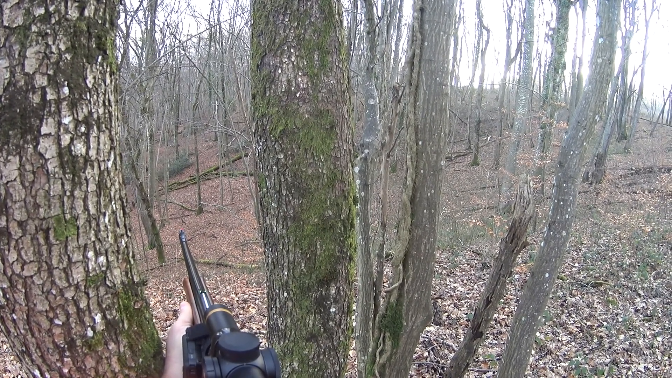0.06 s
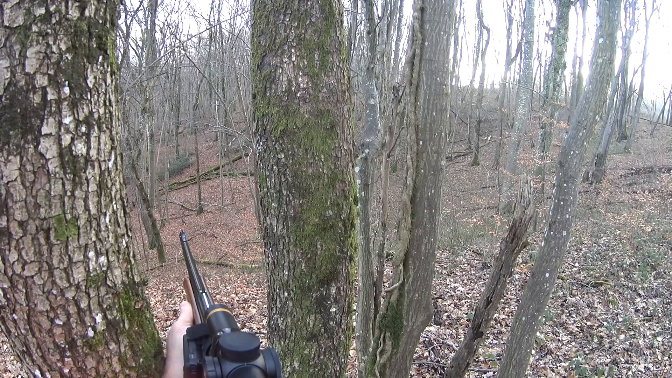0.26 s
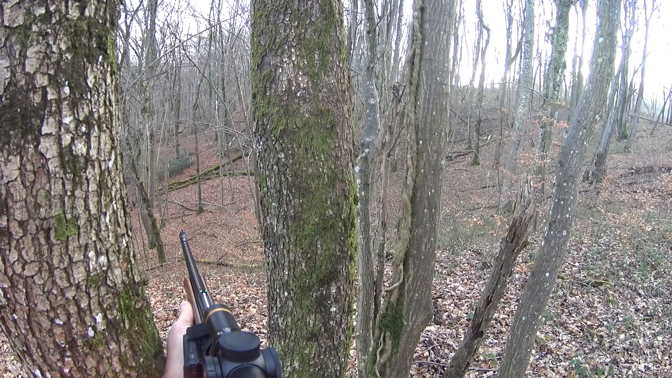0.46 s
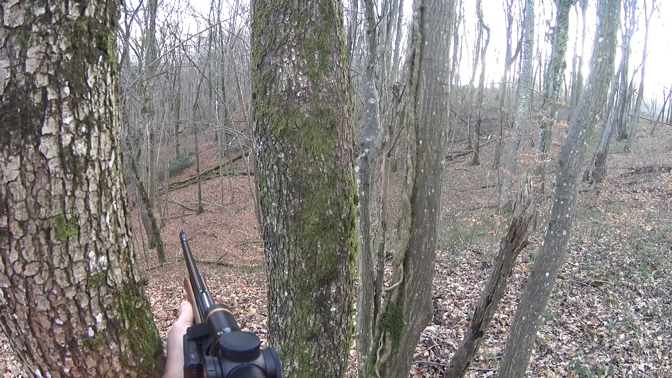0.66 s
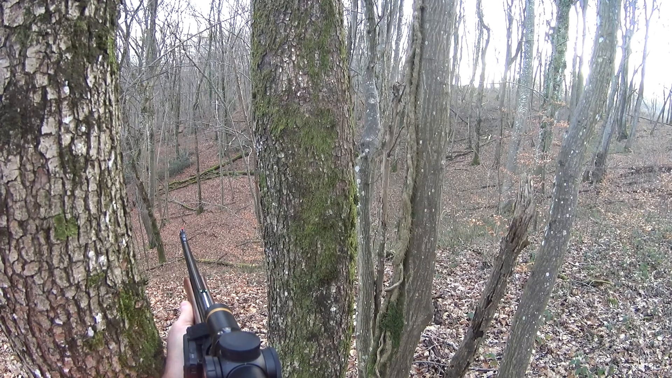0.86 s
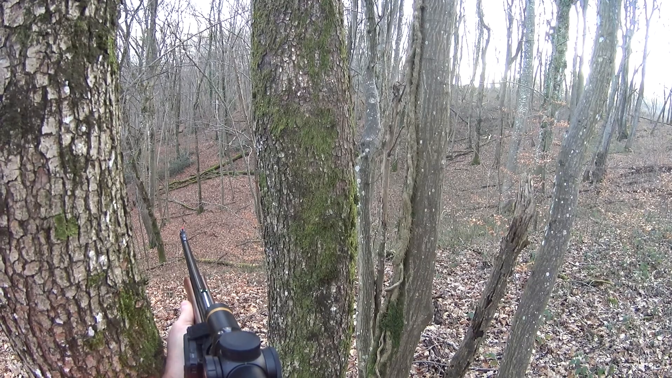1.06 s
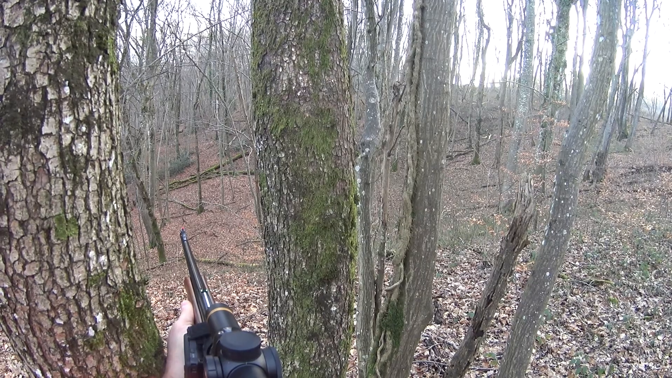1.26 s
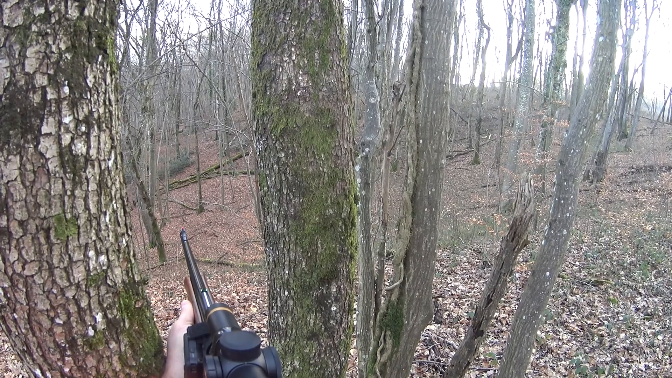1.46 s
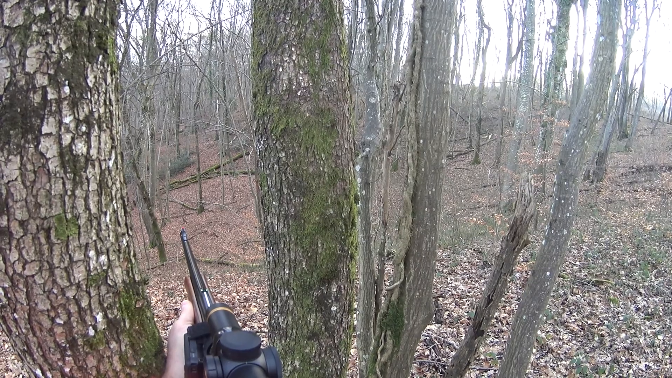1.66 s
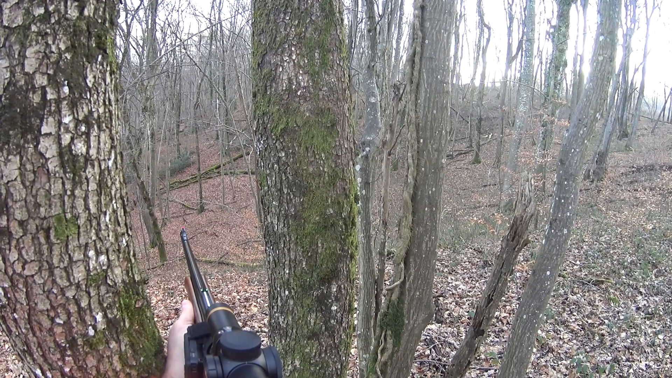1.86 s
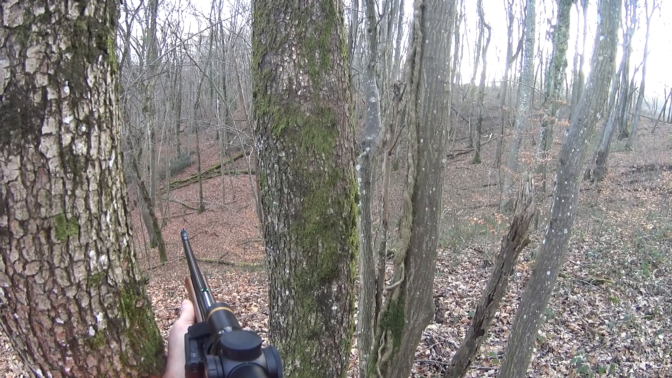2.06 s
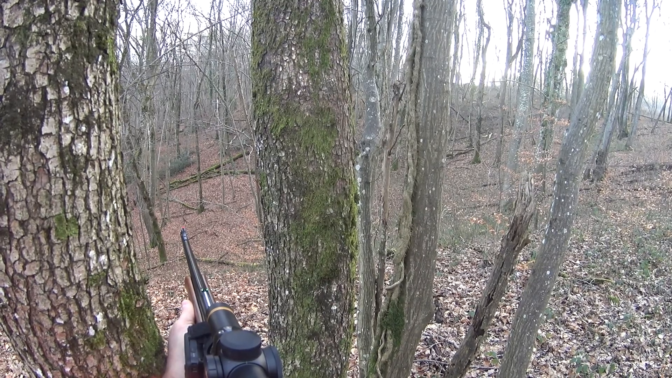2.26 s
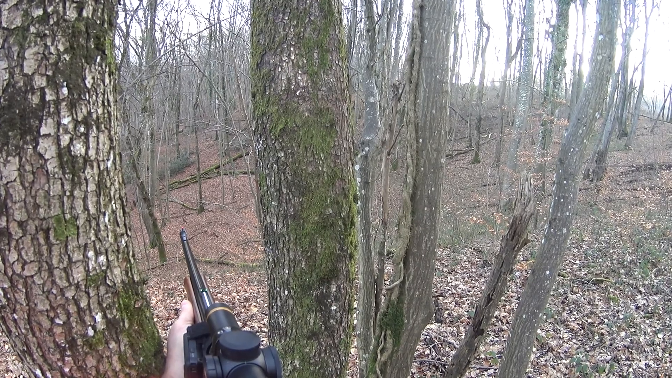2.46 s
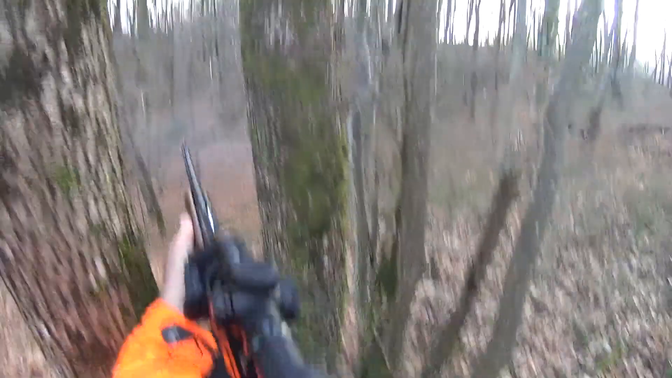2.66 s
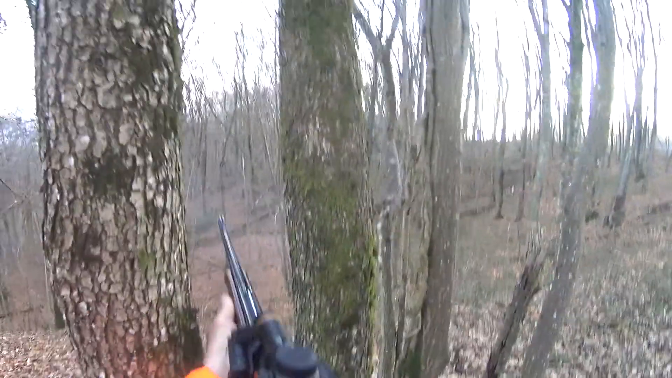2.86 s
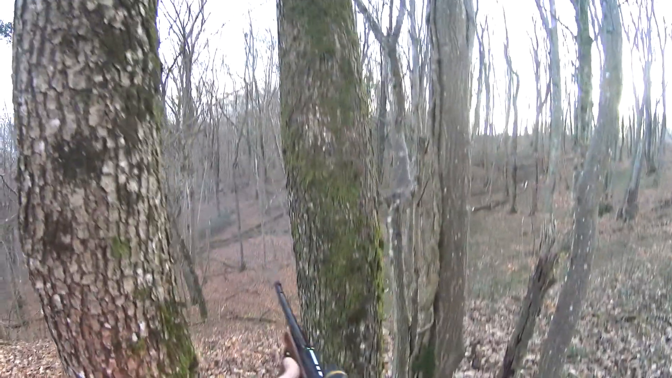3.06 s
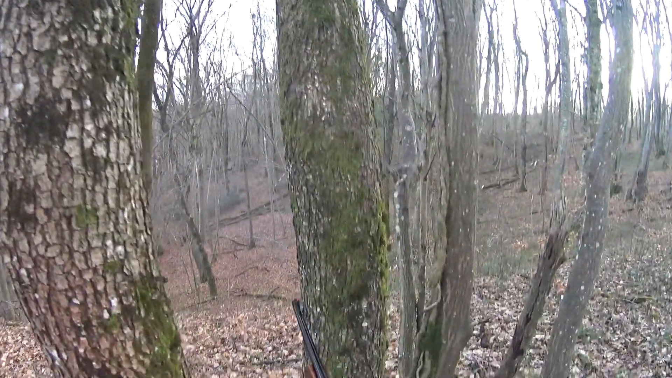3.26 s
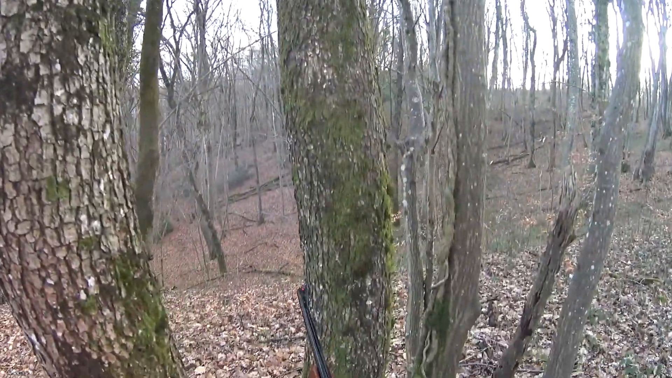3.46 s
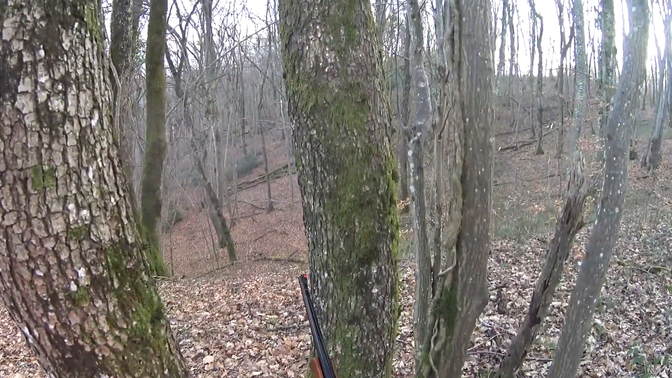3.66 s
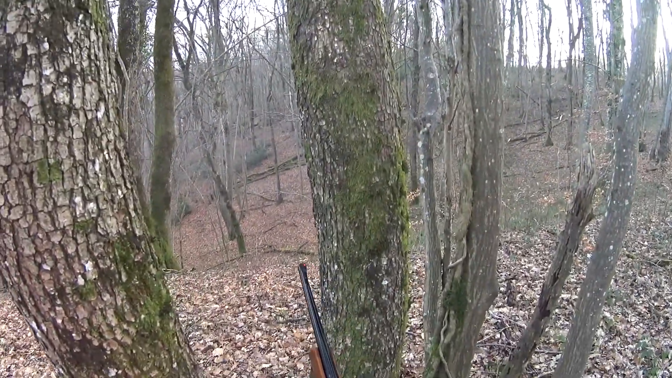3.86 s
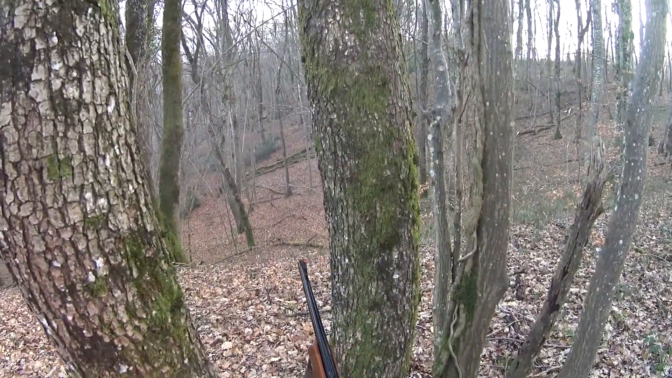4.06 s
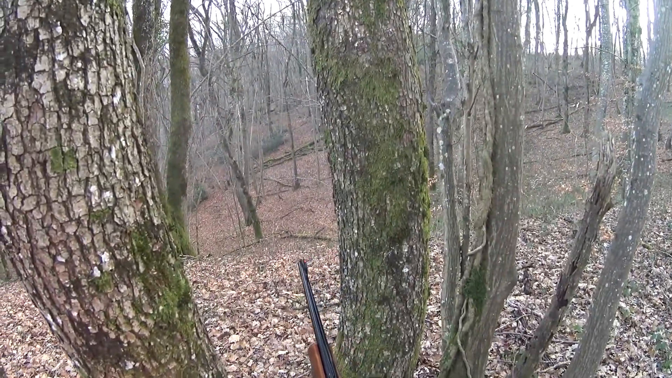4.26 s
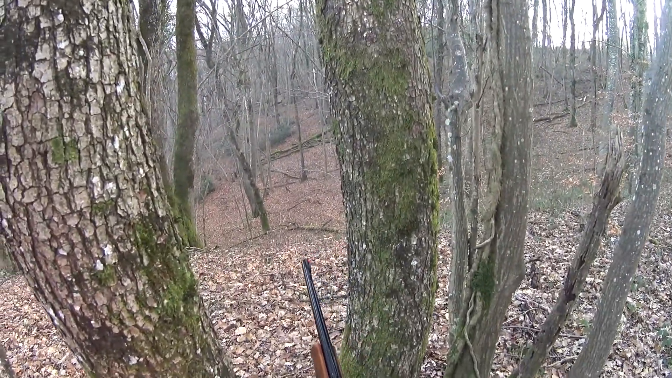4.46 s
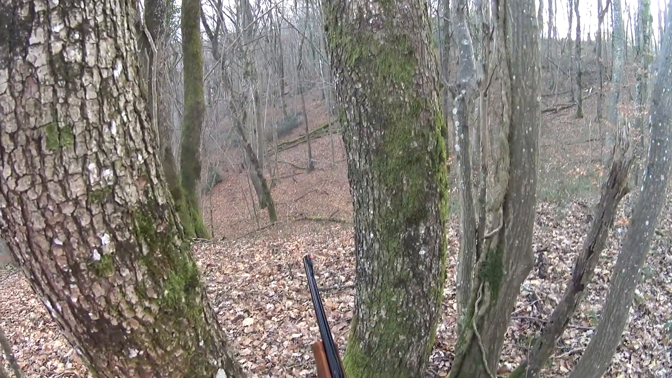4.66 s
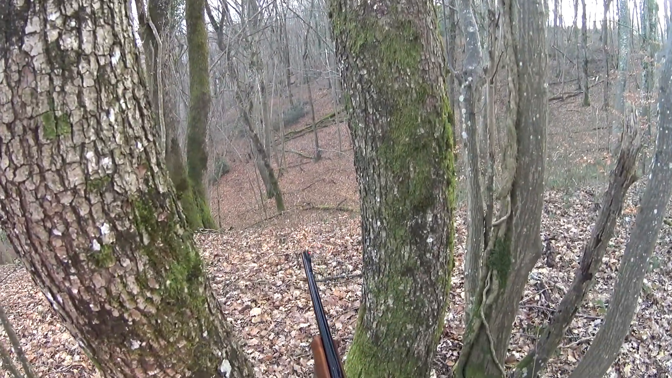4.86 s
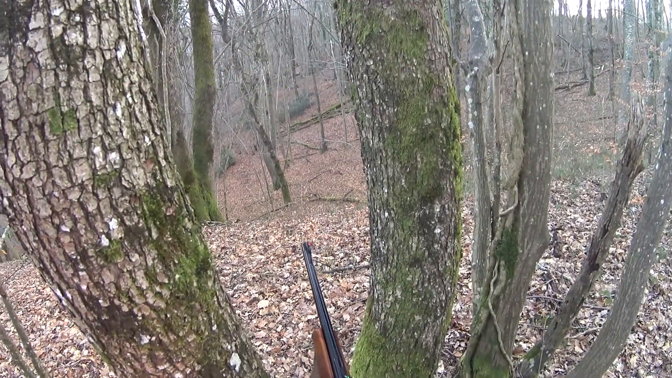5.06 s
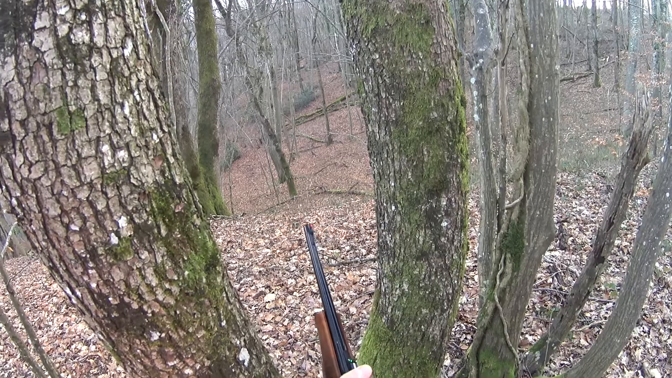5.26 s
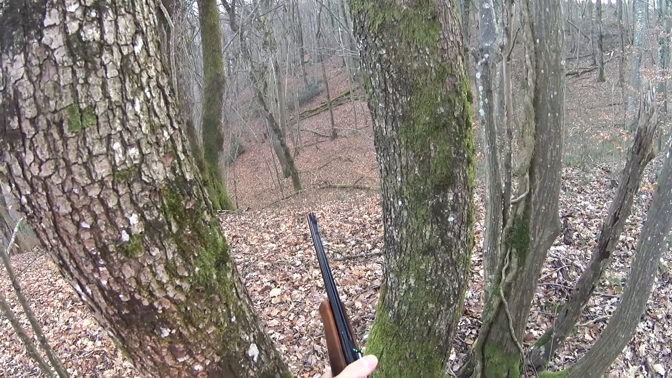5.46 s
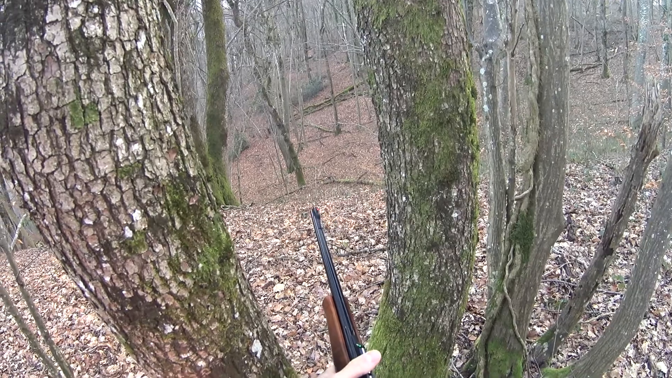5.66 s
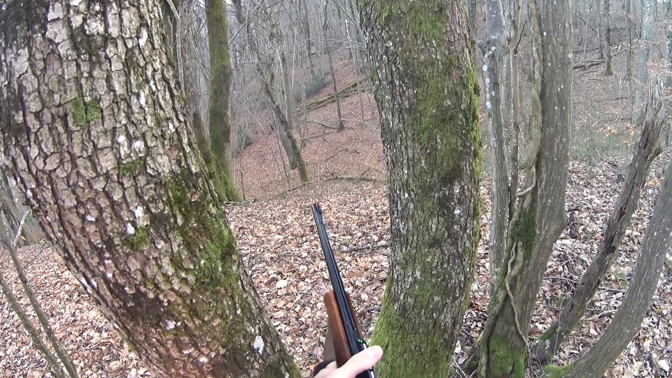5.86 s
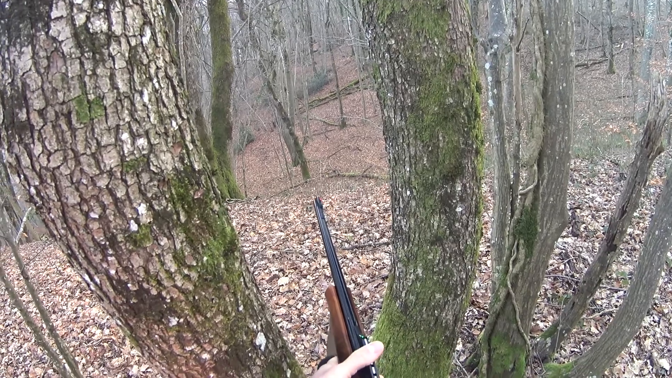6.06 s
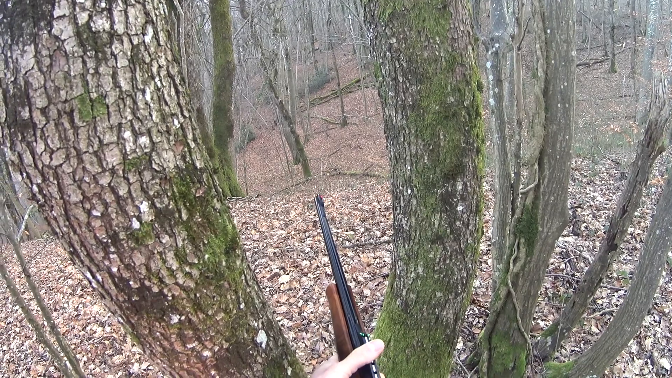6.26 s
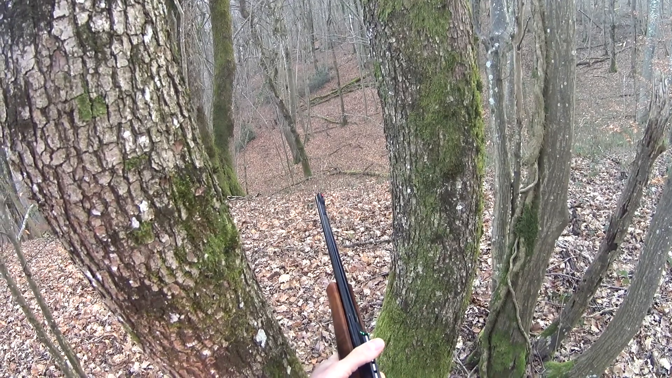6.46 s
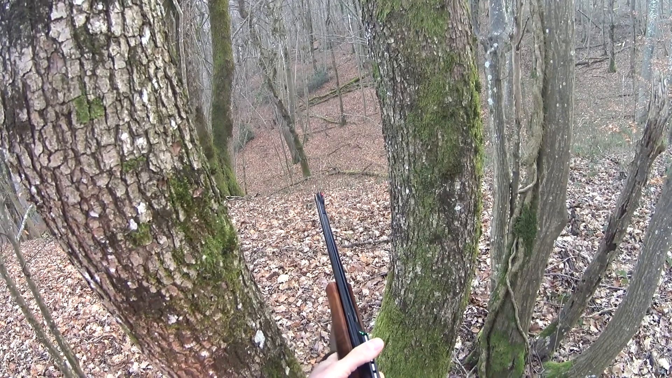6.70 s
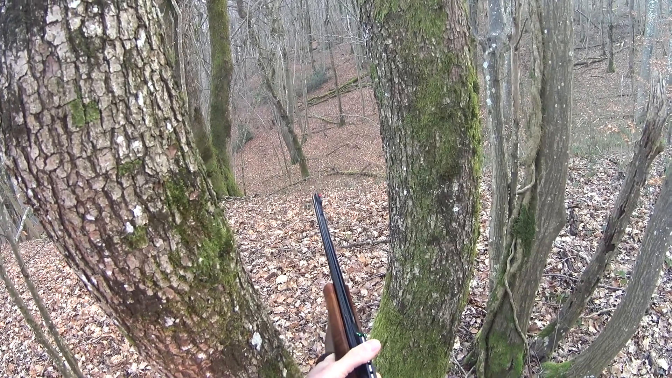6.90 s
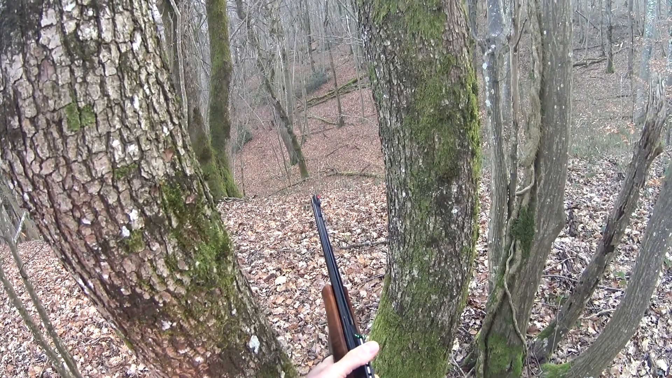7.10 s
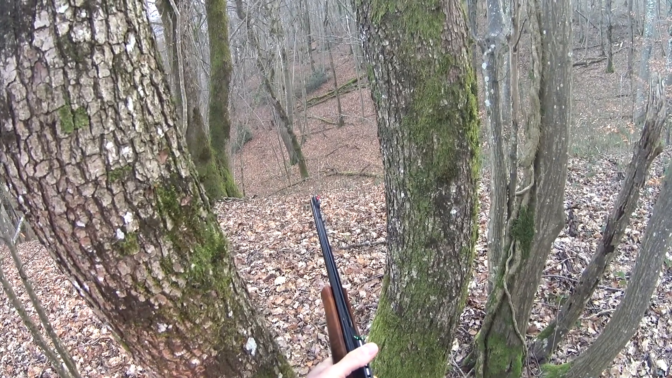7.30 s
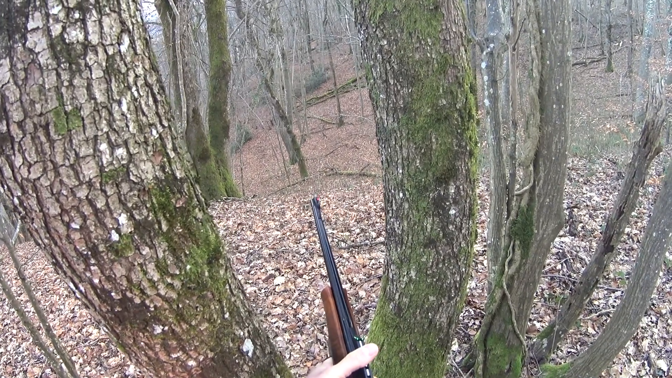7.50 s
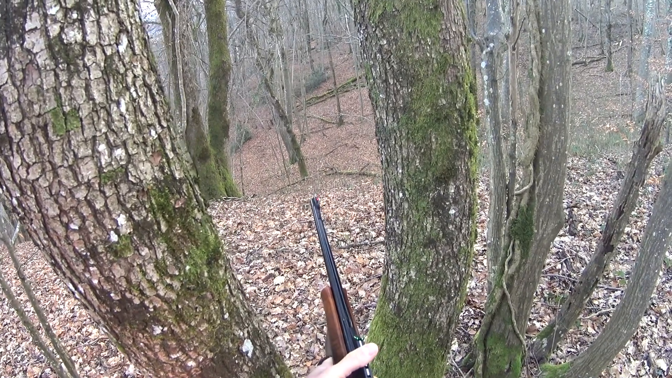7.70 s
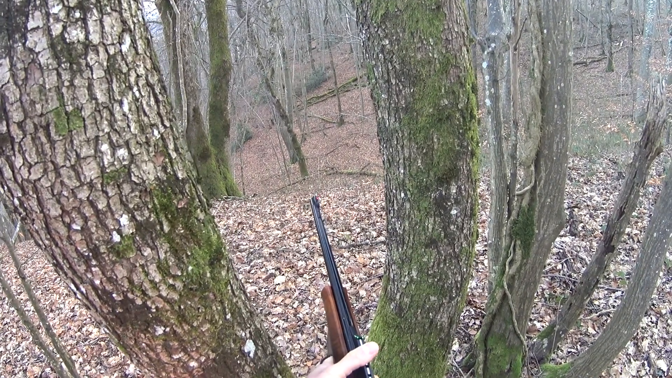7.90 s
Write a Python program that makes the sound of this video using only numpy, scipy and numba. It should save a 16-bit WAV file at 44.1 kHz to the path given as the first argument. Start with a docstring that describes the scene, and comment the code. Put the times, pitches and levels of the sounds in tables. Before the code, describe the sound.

A quiet wood gives a low, softly swelling hush, with a tiny click and a few very faint, distant whistles. Then a rifle fires once, sharp and loud, heard from the shooter's own position. The blast scatters densely among the trunks and falls away. A faint rustle and small dry ticks follow close by, while a softer, duller echo returns from a far hillside and slowly fades.

```python
"""A rifle shot in a winter wood

The lock strikes, the muzzle blast follows, and countless bare trunks scatter it back, duller the longer
the path; a far hillside answers later. A limiter holds the first part flat. Small ticks, a rustle and
faint whistles lie over the hush of the wood, all heard from the shooter's head."""
import sys
import numpy as np
from scipy import signal
from scipy.io import wavfile
from scipy.ndimage import uniform_filter1d
from numba import njit

SR = 44100
rng = np.random.default_rng(int(sys.argv[2]) if len(sys.argv) > 2 else 0)


def generate_wav(signal):
    """Clip the signal to [-1, 1] and save it as 16-bit WAV at the path in sys.argv[1]."""
    frames = np.transpose(np.atleast_2d(signal))
    scaled = np.clip(frames, -1, 1) * 32767
    pcm = np.round(scaled).astype(np.int16)
    wavfile.write(sys.argv[1], SR, pcm)


N = 350188

# Spectrum of the quiet wood: (frequency [Hz], relative density [dB])
HUSH_SPECTRUM = [(12, -25.5), (20, -5.5), (60, -4.5), (83, -8), (100, -14), (140, -21.5), (250, -22.5),
                 (560, -22.5), (1080, -33.5), (3000, -41), (6200, -48), (7300, -59), (9000, -57),
                 (11000, -58.5)]
# Stereo width of the hush: (frequency [Hz], side minus mid [dB])
HUSH_WIDTH = [(60, -22), (110, -17), (190, -5.5), (350, -7), (620, -4.5), (1120, 4.5), (2020, 3.5),
              (3620, 1.5), (6510, -3.5), (11700, -8)]
# Far whistles, perhaps a bird: (time [s], duration [s], pitch [Hz], level [dB])
WHISTLE_NOTES = [(1.44, 0.13, 2520, -73), (1.63, .06, 2430, -71), (1.79, .07, 2010, -69),
                 (1.91, 0.064, 2020, -72)]
# Spectrum of the rustle: (frequency [Hz], relative level [dB])
RUSTLE_SPECTRUM = [(3000, -20), (4200, -5), (4600, 8), (5000, 0), (6000, -2.5), (6400, 5), (6900, -8.5),
                   (8600, -3), (9400, -6), (10300, -4), (11000, -4)]
# A click, then dry ticks: (time [s], level [dB], centre [Hz], bandwidth [Hz], left minus right [dB])
TICK_BURSTS = [(1.4735, -56, 5000, 9000, -1), (3.1494, -48, 10400, 800, -27), (3.3494, -57, 10700, 1200, 2),
               (3.3967, -48, 5500, 1994, 4.5), (3.4894, -57, 9000, 5000, 0), (3.5583, -59, 8500, 3000, 3),
               (3.5892, -54, 8900, 2500, 4), (3.63, -55, 9470, 4000, 1), (3.6691, -52, 7500, 6000, -1),
               (3.7719, -51, 6000, 3500, 0), (3.806, -51, 8450, 6000, 1), (3.8394, -59, 8500, 4000, 1),
               (3.9464, -54, 6520, 6000, 1), (4.0494, -62, 6470, 2000, 1), (4.1205, -54, 7500, 5000, 2),
               (4.5734, -62.5, 5000, 3000, 17), (4.5894, -60, 5480, 3500, 1)]
# Spectrum of the echoes before absorption: (frequency [Hz], relative density [dB])
ECHO_SPECTRUM = [(20, -39.5), (45, -30.5), (75, -10.5), (110, -10.5), (160, -10.5), (250, -5.5),
                 (450, -6.5), (720, -8.5), (1400, -11), (2500, -13), (4500, -17), (6400, -24),
                 (7400, -31.5), (9500, -32), (11000, -28.5), (12000, -40.5)]
# Stereo width of the echoes: (frequency [Hz], side minus mid [dB])
ECHO_WIDTH = [(60, -20.5), (190, -22.5), (350, -22.5), (500, -15), (700, -12.5), (1120, -8.5), (3620, -9),
              (11700, -9)]
# Absorption by air and bark: (frequency [Hz], loss with travel time [dB/s])
ABSORPTION = [(500, 0.5), (1000, 1.5), (2000, 4.5), (4000, 14), (6000, 28), (8000, 40.5), (11000, 58)]
# Envelopes of the hillside echo and the trunk echo: (time [s], level [dB])
HILLSIDE_ENVELOPE = [(4.0, -55), (4.5, -44.5), (4.78, -39), (4.9, -37.5), (5.2, -37.5), (5.75, -38.5),
                     (6.4, -42), (7.08, -48), (7.94, -53)]
TRUNK_ENVELOPE = [(2.6, -14.5), (2.63, -6), (2.8, -9), (3.09, 1), (3.22, -17), (3.5, -26.5), (3.7, -32.5),
                  (3.95, -36), (4.45, -43), (5.2, -59)]
# Tone of each echo at its start and its drift, before weighting by frequency; boom is a hollow hump:
# (bass [dB], drift [dB/s], treble [dB], drift [dB/s], boom [dB], growth [dB/s], boom centre [Hz],
# glide [octaves/s], left minus right [dB])
HILLSIDE_TONE = (-2.5, 4.5, 4.5, -2.8, 3.5, 0.17, 602, -0.12, 1)
TRUNK_TONE = (1.5, -4.5, -1.5, 0.9, 3, 1, 370.5, -0.04, -0.13)
# Waves off the ground and nearest trunks: (time [s], level [dB], duration [s], left minus right [dB])
EARLY_REFLECTIONS = [(2.58, -7.5, 0.00097, -2), (2.598, -3.5, 0.0011, 0.5), (2.606, -1.5, 0.0012, 3.5),
                     (2.6137, -5.5, 0.0025, -9.5), (2.623, -1.5, .004, 0), (2.634, 7, 0.0018, -5),
                     (2.64, -27, 0.0024, -6), (2.698, 0.5, 0.00067, -0.5), (2.769, 0, 0.0012, -1),
                     (2.895, -11, 0.0005, -5), (2.93, 1, 0.0004, 4), (2.987, 16, 0.0003, -3)]
# Noise bursts of lock and muzzle: (time [s], level [dB], centre [Hz], bandwidth [Hz], 60 dB decay [s])
SHOT_BURSTS = [(2.568, -28, 2945, 6004, 0.06), (2.5692, -20.5, 5000, 10000, 0.062),
               (2.5712, -10, 4495, 8000, 0.012), (2.579, -0.5, 4500, 8000, 0.021),
               (2.579, -2, 1821, 2522, 0.011), (2.582, -6.5, 4000, 4465, 0.5)]

SHOT_S = 2.5785
HUSH_DB, SWELL_STEP_S = -49, .4
RUSTLE_DB, RUSTLE_PEAK_S, RUSTLE_STOP_S = -62.5, 4.1, 4.36
CRACKLE_DB, CRACKLE_FADE_S, SURGE_DB, BOOM_OCTAVES = 1.5, 0.79, 0.5, 0.3
BASS_BUILD_S, TREBLE_BUILD_S = .02, 0.054
LIMIT_DB, ATTACK_S, RELEASE_S, CUTOFF_HZ = -8, 0.00041, 0.018, 11100


def undb(db):
    """Amplitude ratio of a level in decibels."""
    return 10 ** (np.asarray(db) / 20)


def on_hz(table, hz):
    """A spectrum interpolated on a log-frequency axis, as a column."""
    f, value = np.transpose(table)
    return np.interp(np.log(hz + 1), np.log(f + 1), value)[:, None]


def pan(sound, pan_db):
    """A level difference between the channels gives a sound its direction."""
    return sound * undb(np.array([[pan_db], [-pan_db]]) / 2)


def add(out, s, sound, db, pan_db=0):
    """Superposition: a short sound joins the mix at time s."""
    i = int(s * SR)
    out[:, i:i + sound.shape[-1]] += pan(sound, pan_db) * undb(db)


def flutter(count, span):
    """A moving average turns white noise into a slow fluctuation of unit variance."""
    return uniform_filter1d(rng.standard_normal(count), size=span) * np.sqrt(span)


def shaped_noise(gain_db, size, lean=0., grain_db=0.):
    """Short-time filtering: gain_db(hz, t) gives mid and side levels; left and right come out."""
    grains = undb(grain_db * np.repeat(rng.exponential(size=N // 32 + 1), 32)[:N])
    grains /= np.sqrt(uniform_filter1d(grains ** 2, size=8192))
    noise = rng.standard_normal((2, N)) * grains
    frames = dict(fs=SR, nperseg=size, noverlap=size * 3 // 4)
    hz, t, (mid, side) = signal.stft(noise, **frames)
    # a side part a quarter cycle off the mid makes one channel lead
    side = np.sqrt(1 - lean ** 2) * side + 1j * lean * mid
    spectra = np.array([mid, side]) * undb(gain_db(hz, t))
    mid, side = signal.istft(spectra, **frames)[1][:, :N]
    return np.array([mid + side, mid - side])


def burst(hz, width_hz, t60):
    """A transient: 30 ms of exponentially damped band noise, with peak 1."""
    t = np.arange(int(.03 * SR)) / SR
    edges = np.clip([hz - width_hz / 2, hz + width_hz / 2], 100, 16000)
    band = signal.butter(2, edges, "band", fs=SR, output="sos")
    mid, side = signal.sosfilt(band, rng.standard_normal((2, len(t))))
    puff = np.array([mid + .2 * side, mid - .2 * side]) * undb(-60 * t / t60)
    return puff / np.abs(puff).max()


def hush():
    """Ambient noise of the wood: random amplitude modulation makes its low rumble swell and sink."""
    def gain_db(hz, t):
        gust = on_hz([(80, 0.77), (200, .3)], hz) * flutter(len(t), 8)
        drift = np.interp(t, np.arange(len(t)) * SWELL_STEP_S, rng.standard_normal(len(t)))
        swell = on_hz([(70, 0.55), (110, 0.22)], hz) * (drift - drift.mean())
        mid = on_hz(HUSH_SPECTRUM, hz) + gust + swell
        return np.array([mid, mid + on_hz(HUSH_WIDTH, hz)])
    sound = shaped_noise(gain_db, size=4096, lean=.3)
    return sound * undb(HUSH_DB) / sound.mean(axis=0).std()


def whistles():
    """Pure tones under smooth envelopes, each gliding slightly down in frequency."""
    out = np.zeros((2, N))
    for s, length, hz, db in WHISTLE_NOTES:
        t = np.arange(int(length * SR)) / SR
        phase = 2 * np.pi * hz * t * (1 - .01 * t / length)
        add(out, s, np.sin(phase) * np.hanning(len(t)), db)
    return out


def rustle():
    """Grainy friction noise, as of cloth settling after the shot."""
    def gain_db(hz, t):
        rise = 16 * np.maximum(RUSTLE_PEAK_S - t, 0)  # slopes in dB/s
        sag = 9 * np.maximum(t - RUSTLE_PEAK_S, 0)
        stop = 148 * np.maximum(t - RUSTLE_STOP_S, 0)
        mid = on_hz(RUSTLE_SPECTRUM, hz) + RUSTLE_DB - 99 * (t < SHOT_S) - rise - sag - stop
        return np.array([mid, mid - 4])
    return shaped_noise(gain_db, size=512, grain_db=1.5)


def ticks():
    """Fast-decaying transients: one faint, sharp click before the shot, then small dry ticks after it."""
    out = np.zeros((2, N))
    for s, db, hz, width_hz, pan_db in TICK_BURSTS:
        add(out, s, burst(hz, width_hz, t60=0.014), db, pan_db)
    return out


def scattered_echo(envelope, tone):
    """Scattering merges many returns into noise; absorption takes more treble the longer the path."""
    times, levels = np.transpose(envelope)
    bass_db, bass_drift, treble_db, treble_drift, boom_db, boom_growth, boom_hz, glide, pan_db = tone

    def gain_db(hz, t):
        colour = on_hz(ECHO_SPECTRUM, hz)
        mid_band = (hz > 250) & (hz < 1000)  # the envelope refers to this band's power
        colour -= 10 * np.log10(np.sum(undb(2 * colour[mid_band])) / len(hz))
        level = np.interp(t, times, levels, right=-150)
        age = np.maximum(t - times[0], 0)
        bass = on_hz([(60, 1.2), (130, 0.78), (300, 0.11)], hz) * (bass_db + bass_drift * age)
        treble = on_hz([(700, 0.051), (3000, 0.63)], hz) * (treble_db + treble_drift * age)
        absorbed = on_hz(ABSORPTION, hz) * np.maximum(t - SHOT_S, 0)
        octaves_off = np.log2((hz[:, None] + 1) / boom_hz) - glide * age
        boom = (boom_db + boom_growth * age) * np.exp(-(octaves_off / BOOM_OCTAVES) ** 2)
        # trunks stand unevenly, so the returns come in surges
        surge = SURGE_DB * on_hz([(200, .3), (2000, 1)], hz) * flutter(len(t), 3)
        mid = colour + level + bass + treble - absorbed + boom + surge
        return np.array([mid, mid + on_hz(ECHO_WIDTH, hz)])

    # single near trunks stand out; far ones blur together
    delay = np.arange(N) / SR - SHOT_S
    crackle_db = CRACKLE_DB * np.exp(-(delay / CRACKLE_FADE_S) ** 2)
    return pan(shaped_noise(gain_db, size=1024, grain_db=crackle_db), pan_db)


def hillside_echo():
    """Propagation delay: the far hillside is silent until its first return arrives."""
    arrived = np.arange(N) / SR > HILLSIDE_ENVELOPE[0][0]
    return scattered_echo(HILLSIDE_ENVELOPE, HILLSIDE_TONE) * arrived


def trunk_echo():
    """Reverberation builds up as returns from the trunks gather, the bass sooner than the treble."""
    delay = np.maximum(np.arange(N) / SR - SHOT_S, 0)
    echo = scattered_echo(TRUNK_ENVELOPE, TRUNK_TONE)
    bass = signal.sosfilt(signal.butter(2, 1500, fs=SR, output="sos"), echo)
    treble = echo - bass
    return bass * (1 - np.exp(-delay / BASS_BUILD_S)) + treble * (1 - np.exp(-delay / TREBLE_BUILD_S))


def early_reflections():
    """The ground and nearest trunks reflect the blast as separate N-shaped pressure waves."""
    out = np.zeros((2, N))
    for s, db, length, pan_db in EARLY_REFLECTIONS:
        wave = np.linspace(1, -1, int(length * SR))
        rounded = np.convolve(wave, np.hanning(9) / 4)  # rough bark rounds the fronts
        add(out, s, rounded, db, pan_db)
    return out


def recoil():
    """Structure-borne sound: recoil shakes the microphones with one low pulse."""
    out = np.zeros((2, N))
    add(out, s=2.618, sound=-np.hanning(int(.028 * SR)), db=-12, pan_db=2)
    return out


def shot():
    """Brief impulses have broad spectra: the lock strikes, then the blast leaves the muzzle."""
    out = np.zeros((2, N))
    for s, db, hz, width_hz, t60 in SHOT_BURSTS:
        add(out, s, burst(hz, width_hz, t60), db)
    return out


def scene():
    """Direct sound, reflections and background superpose at the microphones."""
    rifle = shot() + recoil() + early_reflections() + trunk_echo() + hillside_echo()
    return rifle + rustle() + ticks() + whistles() + hush()


@njit
def follow(peak, attack, release):
    """An envelope follower climbs quickly towards each peak and sinks back slowly."""
    level, out = 0., np.empty(len(peak))
    for i in range(len(peak)):
        level += (peak[i] - level) * (attack if peak[i] > level else release)
        out[i] = level
    return out


def record(dry):
    """A limiter's finite attack lets fronts overshoot into soft saturation; a low-pass cuts the top."""
    envelope = follow(np.abs(dry).max(axis=0), 1 / (ATTACK_S * SR), 1 / (RELEASE_S * SR))
    gain = np.minimum(1, undb(LIMIT_DB) / (envelope + 1e-9))
    low_pass = signal.ellip(9, .2, 45, CUTOFF_HZ, fs=SR, output="sos")
    return signal.sosfilt(low_pass, np.tanh(dry * gain))


dry = scene()
out = record(dry)
generate_wav(out)
```